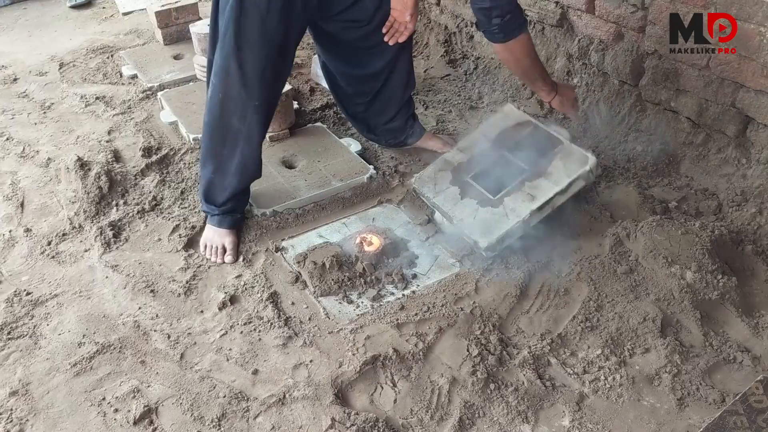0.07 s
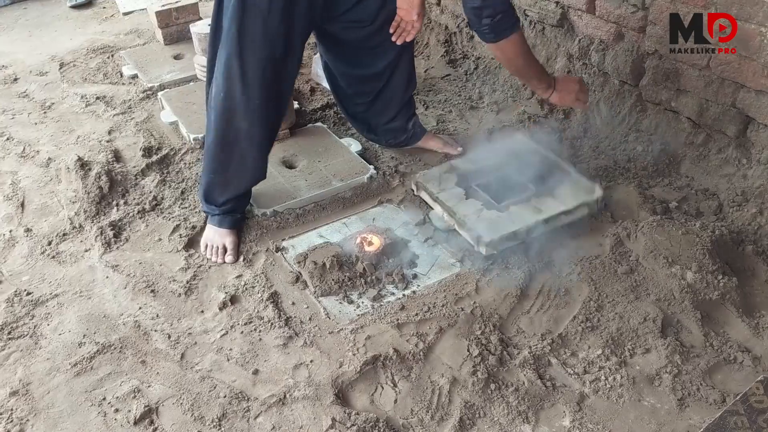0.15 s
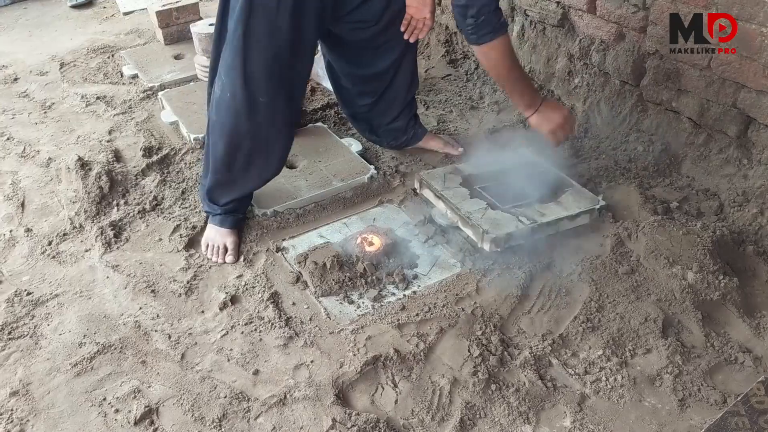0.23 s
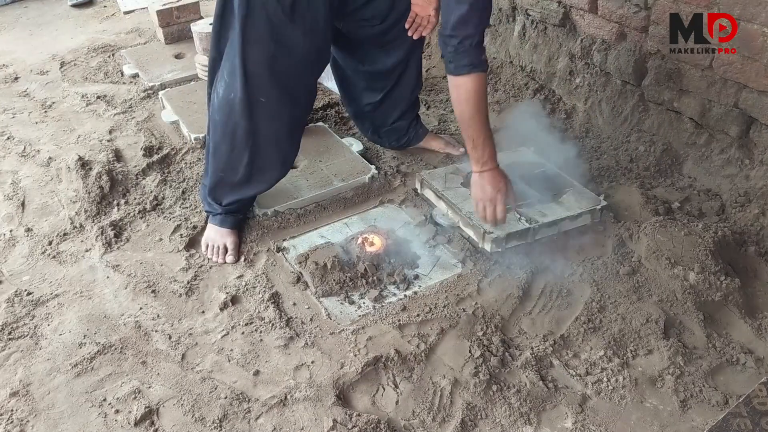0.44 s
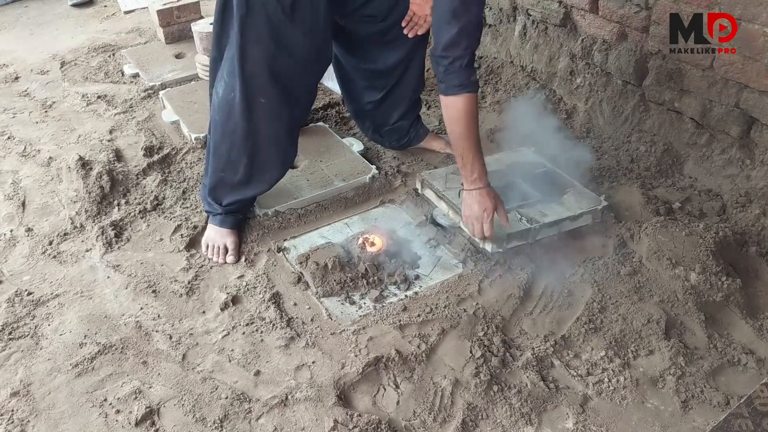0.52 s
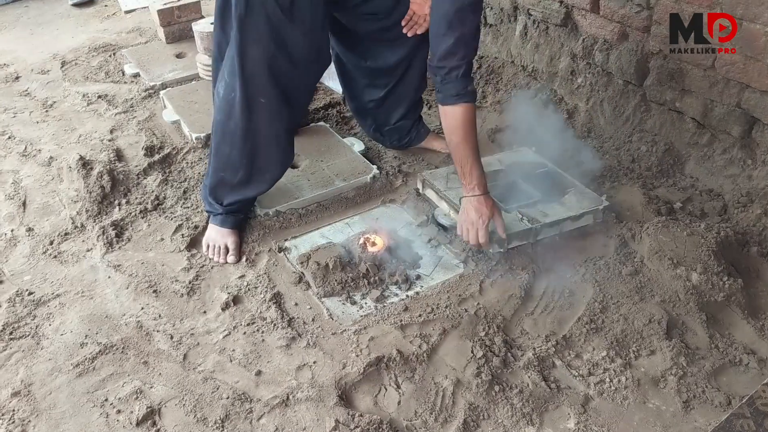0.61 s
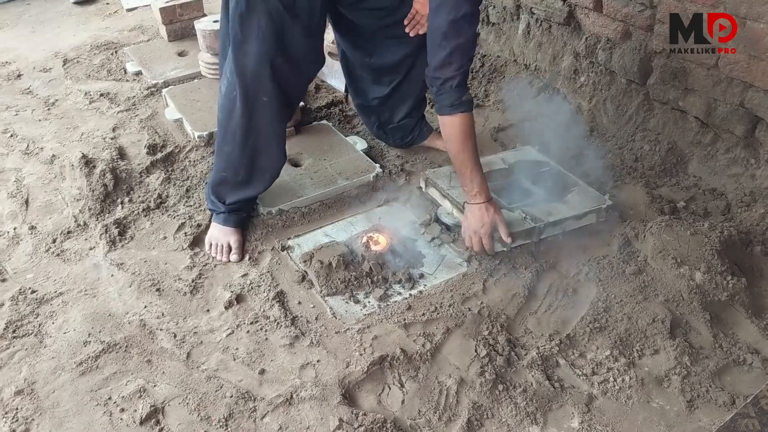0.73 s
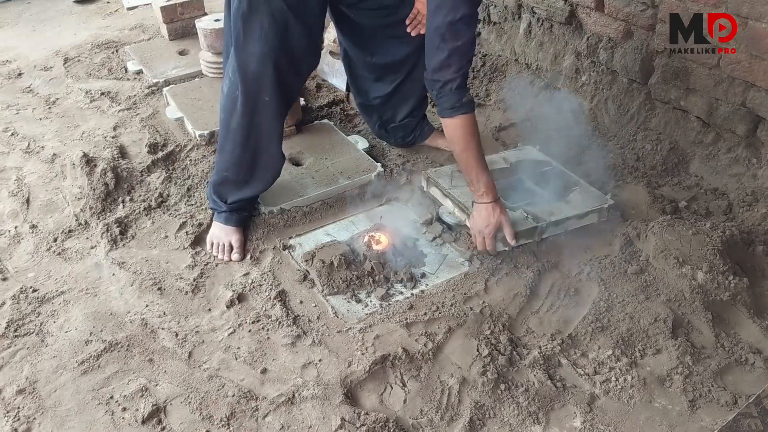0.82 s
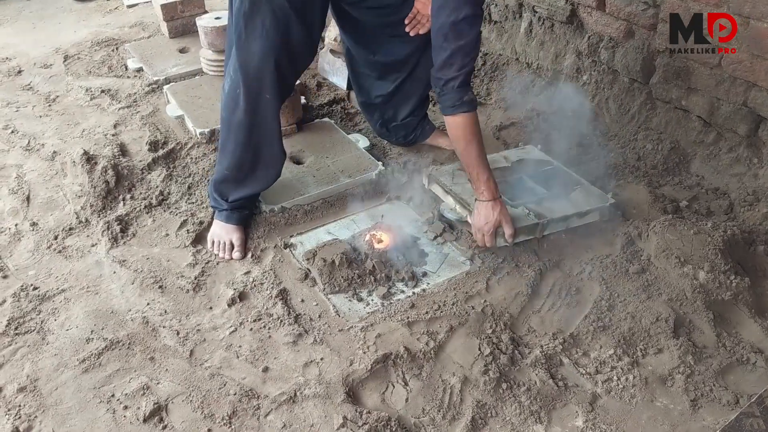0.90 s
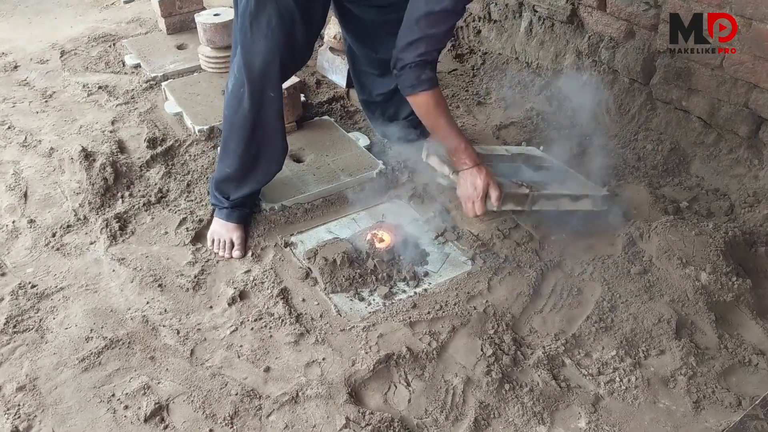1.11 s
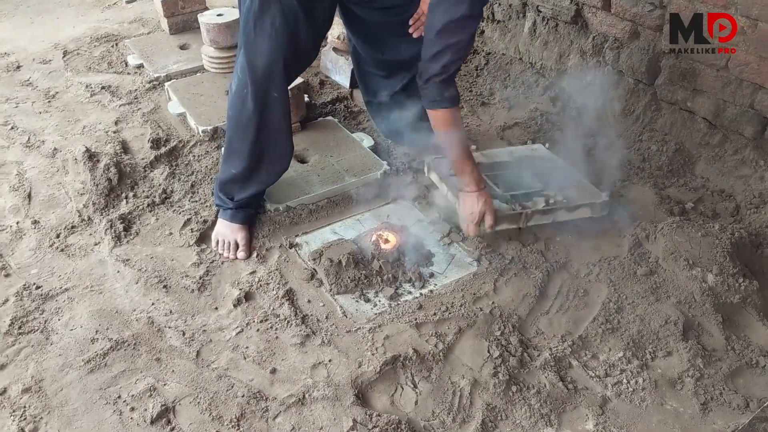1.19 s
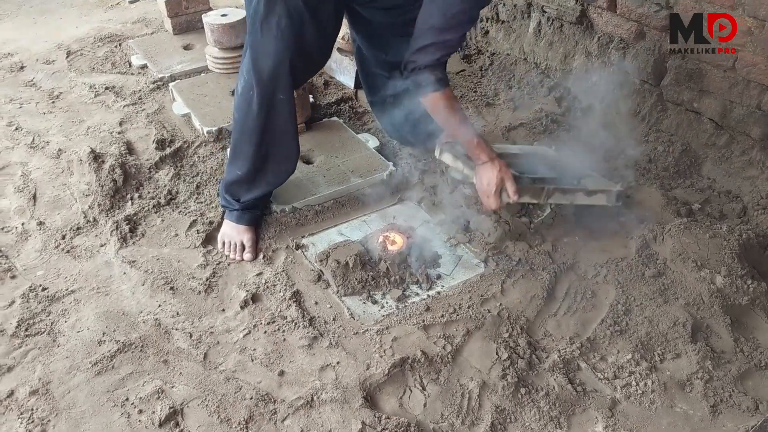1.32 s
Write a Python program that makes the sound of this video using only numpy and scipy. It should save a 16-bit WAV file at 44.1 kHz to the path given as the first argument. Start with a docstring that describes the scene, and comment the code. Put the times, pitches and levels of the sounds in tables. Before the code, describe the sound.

A heavy metal frame falls flat on sand with a sharp, briefly ringing clank and rocks to rest. It ticks faintly, then clanks twice more as it is shifted, over soft grating sand and distant workshop machinery.

```python
"""One microphone on a sandy foundry floor, machinery humming far off throughout.
A heavy metal moulding frame rings faintly, then falls flat with a thud at 0.23 s and rocks as it settles.
It ticks as a hand grips it, then clanks twice as it is shifted, at 0.88 and 1.25 s, sand grating below.
Each place of contact rings the same modes with other strengths, over a wash of dense weak modes
and the workshop's echo."""
import sys
import numpy as np
from scipy import signal
from scipy.fft import rfft, irfft, next_fast_len
from scipy.io import wavfile
from scipy.ndimage import map_coordinates

SR = 44100
rng = np.random.default_rng(int(sys.argv[2]) if len(sys.argv) > 2 else 0)


def unload_audio(sound):
    """Save the sound as a 16-bit wav file, at the path given as the first command line argument."""
    columns = np.transpose(np.atleast_2d(sound))
    # keep every value between -1 and 1, then stretch to whole-number steps
    steps = np.round(np.clip(columns, -1, 1) * 32767)
    wavfile.write(sys.argv[1], SR, steps.astype(np.int16))


N = 59535

# the frame's strong modes: f/Hz, t60/s, then relative level/dB when struck at each of the PLACES
FRAME_MODES = [(1200.0, 0.18, -21.0, -14.0, -11.0, -17.0, -14.0),
               (1600.0, 0.22, -22.0, -3.0, -15.0, -11.0, -16.0),
               (1739.0, 0.35, -4.0, -15.0, -25.0, -9.0, -7.0),
               (1775.0, 0.33, -7.0, -13.0, -24.0, -14.0, -13.0),
               (2300.0, 0.38, -13.0, -6.0, -17.0, -14.0, -12.0),
               (2406.0, 0.32, -8.0, -12.0, -11.0, -23.0, -15.0),
               (2830.0, 0.27, -11.0, -14.0, -17.0, -11.0, -5.0),
               (2975.0, 0.24, -3.0, -19.0, -20.0, -16.0, -15.0),
               (3060.0, 0.27, -10.0, -16.0, -25.0, -5.0, -9.0), (3316.0, 0.23, 0.0, -3.0, -12.0, 1.0, -7.0),
               (3451.0, 0.27, -21.0, -2.0, -21.0, -14.0, -15.0),
               (3750.0, 0.32, -2.0, -8.0, -26.0, -18.0, -2.0),
               (3887.0, 0.3, -6.0, -18.0, -14.0, -17.0, -4.0),
               (3930.0, 0.27, -10.0, -18.0, -14.0, -19.0, -2.0),
               (4010.0, 0.27, -5.0, -18.0, -18.0, -24.0, -15.0),
               (4124.0, 0.29, -1.0, -7.0, -16.0, -17.0, -13.0),
               (4465.0, 0.36, -10.0, -4.0, -8.0, -22.0, -19.0),
               (4530.0, 0.29, -15.0, -3.0, -4.0, -23.0, -19.0),
               (4670.0, 0.27, -16.0, -3.0, -15.0, -20.0, -11.0),
               (4764.0, 0.26, -5.0, -7.0, -14.0, -20.0, 0.0), (5245.0, 0.27, -1.0, -0.0, -2.0, -16.0, -8.0),
               (5290.0, 0.27, -3.0, -2.0, -0.0, -13.0, -7.0),
               (5421.0, 0.27, -8.0, -3.0, -4.0, -18.0, -18.0),
               (5650.0, 0.27, -11.0, -5.0, -8.0, -15.0, -18.0),
               (5905.0, 0.3, -15.0, -19.0, -11.0, -7.0, -13.0), (6605.0, 0.25, 0.0, 0.0, -9.0, -18.0, -2.0),
               (6740.0, 0.27, -24.0, -3.0, -22.0, -26.0, -19.0),
               (7191.0, 0.27, -5.0, -14.0, -9.0, -22.0, -13.0),
               (7375.0, 0.27, -10.0, -18.0, -10.0, -29.0, -23.0),
               (7750.0, 0.33, -5.0, -20.0, -18.0, -18.0, -8.0),
               (8193.0, 0.23, -4.0, -13.0, 0.0, -15.0, -12.0),
               (8441.0, 0.27, -13.0, -6.0, -6.0, -24.0, -17.0),
               (9132.0, 0.22, -2.0, -18.0, -7.0, -25.0, -14.0),
               (9250.0, 0.22, -8.0, -13.0, -13.0, -24.0, -13.0),
               (9530.0, 0.22, -23.0, -1.0, -21.0, -24.0, -18.0),
               (9851.0, 0.22, -4.0, -24.0, -15.0, -25.0, -14.0),
               (10330.0, 0.27, -12.0, -24.0, -8.0, -19.0, -8.0),
               (11550.0, 0.22, -16.0, -35.0, -32.0, -29.0, -19.0),
               (12460.0, 0.22, -16.0, -26.0, -24.0, -33.0, -23.0)]
# places of contact on the frame: face, edge, corner, rim, lug
PLACES = ["face", "edge", "corner", "rim", "lug"]


def amp(db):
    """Decibels to gain."""
    return 10 ** (np.asarray(db) / 20)


def unit(x):
    """Scale to rms 1."""
    return x / np.sqrt(np.mean(x ** 2) + 1e-20)


def along(points, hz):
    """Read (f/Hz, value) points on a log frequency axis."""
    freqs, values = np.transpose(points)
    return np.interp(np.log(hz + 1), np.log(freqs + 1), values)


def wobble(per_s, t):
    """A smooth random curve at times t, with per_s knots a second."""
    return map_coordinates(rng.standard_normal(2048), [t * per_s], mode="wrap")


def filtered(x, response):
    """Shape x by a gain that depends on frequency."""
    size = next_fast_len(N + SR // 4)
    return irfft(rfft(x, size) * response(np.fft.rfftfreq(size, 1 / SR)), size)[:N]


def noise(response):
    """Coloured noise of rms 1."""
    return unit(filtered(rng.standard_normal(N), response))


def wavering_tone(hz, t, depth, per_s):
    """A tone of rms 1 whose strength and phase drift."""
    drift = 1 + depth * (wobble(per_s, t) + 1j * wobble(per_s, t))
    return unit(np.real(drift * np.exp(2j * np.pi * (hz * t + rng.random()))))


def add(out, x, start_s):
    """Mix x into out from start_s on; whatever falls before time zero is cut."""
    start = round(start_s * SR)
    x, start = x[max(-start, 0):], max(start, 0)
    out[start:start + len(x)] += x[:N - start]


def far_machinery(t):
    """Machines far across the workshop reach the microphone as rumble, hiss and a wavering hum."""
    # tones of the hum: f/Hz, level/dB
    hum_tones = [(64.6, -70), (107.7, -64.5), (176, -72), (355.3, -66.5)]
    # spectrum of the rumble: f/Hz, relative level/dB
    rumble_spectrum = [(15, -59), (25, -33), (35, -3), (49, 1), (113, -6.5), (135, -2), (172, -2),
                       (234, -9), (328, -12), (356, 0), (386, -16), (738, -18), (1200, -28), (1560, -55),
                       (2640, -120)]
    # spectrum of the hiss: f/Hz, relative level/dB
    hiss_spectrum = [(590, -12.5), (1000, -5.5), (1100, -8), (2010, -9), (2470, -15.5), (2650, -11.5),
                     (3420, -13), (5070, -16.5), (5570, -17), (9380, -18.5), (16000, -35.5)]
    hum = sum(amp(db) * wavering_tone(hz, t, depth=0.28, per_s=8) for hz, db in hum_tones)
    rumble = noise(lambda hz: amp(along(rumble_spectrum, hz)))
    hiss = noise(lambda hz: amp(along(hiss_spectrum, hz)))
    return amp(-54.5) * rumble + amp(-66) * hiss + hum


def crack(colour, t, hold_s=0.0024, t60_s=0.015):
    """The contact itself: a burst of noise that holds for an instant and dies fast."""
    return noise(colour)[:len(t)] * amp(-60 * np.maximum(t - hold_s, 0) / t60_s)


def ring(place, contact, t, scatter_db=2):
    """The strong modes, weighted by the place and the hardness of the contact."""
    freqs, t60s, *levels = np.transpose(FRAME_MODES)
    gains = amp(levels[PLACES.index(place)] + scatter_db * rng.standard_normal(len(freqs)))
    gains = gains * contact(freqs)
    gains = gains / np.linalg.norm(gains)
    # close pairs and echoes make each mode waver
    return sum(gain * amp(-60 * t / t60) * wavering_tone(hz, t, depth=0.25, per_s=50)
               for hz, t60, gain in zip(freqs, t60s, gains))


def clusters(place, hz, width_hz=70):
    """Gain that crowds the weak modes around the strong ones which this place excites."""
    centres, _, *levels = np.transpose(FRAME_MODES)
    grid = np.linspace(0, SR / 2, 2048)
    resonances = 1 / (1 + (2 * (grid[:, None] - centres) / width_hz) ** 2)
    peaks = resonances @ amp(levels[PLACES.index(place)])
    return 1 + amp(3) * np.interp(hz, grid, peaks)


def combed(colour, spacing_hz=60, depth_db=7):
    """Break a smooth colour into many narrow, irregular resonances."""
    knots = rng.standard_normal(1024)
    ripple = lambda hz: np.interp(hz / spacing_hz, np.arange(len(knots)), knots)
    return lambda hz: colour(hz) * amp(depth_db * np.clip(ripple(hz), -2, 1))


def wash(colour, t, build_s=0.0014):
    """Dense weak modes and the workshop's echo: each frequency dies at its own speed."""
    # decay of the wash: f/Hz, t60/s
    decay_times = [(400, 0.13), (1500, 0.36), (4000, .32), (8000, 0.31), (14000, 0.2)]
    hz, slice_s, spectra = signal.stft(noise(colour), SR, nperseg=256)
    decay = amp(-60 * slice_s / along(decay_times, hz)[:, None])
    _, tail = signal.istft(spectra * decay, SR, nperseg=256)
    return tail[:len(t)] * (1 - np.exp(-t / build_s))


def frame_blows():
    """Every blow on the frame is a brief crack of contact, then ring and wash that the sand chokes."""
    # spectrum of the dense weak modes, by place of contact: f/Hz, relative level/dB
    weak_spectra = {"face": [(180, -92), (300, -19.5), (756, -9.5), (1050, -23.5), (1220, -7), (1420, -39),
                    (1730, 1.5), (1940, -33), (2360, -5), (2690, -10), (3340, -7), (3510, -12),
                    (4000, -2.5), (4350, -15.5), (5390, -4), (6250, -20.5), (6570, -6.5), (10100, -2),
                    (11000, -13), (12700, -4.5), (15500, -28.5)], "edge": [(410, -70.5), (700, -26),
                    (776, -15), (1560, -3), (2080, -17), (2430, -4.5), (3030, -20.5), (3360, -2.5),
                    (3970, -17), (4520, -7), (5360, -8.5), (6020, -10), (6680, -6.5), (8990, -8.5),
                    (9850, -8), (12000, -24.5), (15500, -10.5)], "corner": [(410, -40), (700, -70),
                    (1070, -20), (1220, -13), (2050, -16), (2370, -7.5), (2590, -12.5), (3320, -10),
                    (3680, -27), (4410, -4.5), (4890, -21), (5430, -3.5), (6180, -9.5), (8320, -3),
                    (10600, -13), (11200, -28), (15500, -18.5)], "rim": [(800, -25), (2400, -12),
                    (3200, 3.5), (4300, -12), (5800, 5.5), (7000, -10), (12000, -12), (15000, -20)],
                    "lug": [(800, -19), (2500, 7.5), (3900, -4), (7500, -16), (10300, -12), (15000, -40)]}
    # blows: t/s, place, ring/dB, wash/dB, crack/dB, contact centre/Hz, half-width/octaves,
    # attack/s, choked after/s
    blows = [(-.02, "face", -49, -38.5, -38, 3240, 0.62, 0.0009, .13),
             (-.008, "rim", -43.5, -45, -60, 4880, 0.23, .0003, .13),
             (0.2258, "face", -19, -18, -13, 6160, 3, 0.000067, .22),
             (.268, "face", -28.5, -53, -57, 2900, .04, .005, .035),
             (0.296, "face", -37, -49, -60, 1727, 0.084, 0.0017, .06),
             (0.296, "face", -38.5, -38.5, -60, 4150, 0.069, 0.0024, .09),
             (0.314, "face", -35.5, -38, -62, 4460, 0.07, 0.0036, 0.15),
             (0.5281, "rim", -56, -60, -48.5, 7020, 2.05, 0.00036, .1),
             (0.63, "rim", -57.5, -56.5, -46, 2640, 0.56, 0.0028, .15),
             (.664, "lug", -78, -71.5, -55, 8250, 1.2, 0.00059, .2),
             (.678, "lug", -67, -62.5, -71, 9300, 0.97, 0.00079, .2),
             (0.692, "lug", -61.5, -86, -55, 10500, 0.48, 0.00035, .2),
             (.8732, "edge", -44.5, -39.5, -29, 2600, 0.62, 0.00045, .15),
             (0.8789, "edge", -38, -36, -31, 6500, 1.1, 0.00043, .15),
             (1.113, "lug", -51.5, -62, -62, 4030, 0.082, .003, 0.054),
             (1.121, "lug", -49, -60, -66.5, 6740, 2, 0.0027, .2),
             (1.2511, "corner", -36.5, -34.5, -27.5, 6370, 7.5, .0005, .2)]
    out, t = np.zeros(N), np.arange(SR // 2) / SR
    for start_s, place, ring_db, wash_db, crack_db, centre_hz, octaves, attack_s, choke_s in blows:
        contact = lambda hz: 1 / (1 + (np.log2((hz + 1) / centre_hz) / octaves) ** 2)
        colour = lambda hz: amp(along(weak_spectra[place], hz)) * clusters(place, hz) * contact(hz)
        blow = amp(crack_db) * crack(colour, t)
        blow += amp(ring_db) * ring(place, contact, t)
        blow += amp(wash_db) * wash(combed(colour), t)
        envelope = (1 - np.exp(-t / attack_s)) * np.exp(-(t / choke_s) ** 4)
        add(out, blow * envelope, start_s)
    return out


def grating_sand(t, grains_per_s=170):
    """Grains on the floor grate softly while the frame slides."""
    # scrapes under the frame: t/s, length/s, level/dB
    scrapes = [(0.181, 0.12, -59), (0.662, 0.099, -67.5), (1.104, 0.37, -60.5)]
    # spectrum of the grating: f/Hz, relative level/dB
    sand_spectrum = [(1000, -1), (3000, 2), (9000, -1.5), (15000, -12)]
    out = np.zeros(N)
    for start_s, length_s, db in scrapes:
        grit = noise(lambda hz: amp(along(sand_spectrum, hz)))
        roughness = amp(-0.5 * wobble(grains_per_s, t))
        progress = np.clip((t - start_s) / length_s, 0, 1)
        swell = np.sqrt(np.abs(np.sin(np.pi * progress)))
        out += amp(db) * unit(grit * roughness) * swell
    return out


def thuds(t, centre_hz=280, octaves=0.88, rise_s=0.004, t60_s=0.4):
    """A soft, dull push where the frame's weight comes down on the sand."""
    # landings: t/s, level/dB
    landings = [(.227, -57.5), (1.253, -51)]
    out = np.zeros(N)
    for start_s, db in landings:
        body = noise(lambda hz: np.exp(-(np.log2((hz + 1) / centre_hz) / octaves) ** 2))
        envelope = amp(db - 60 * t / t60_s) * (1 - np.exp(-t / rise_s))
        add(out, envelope * body, start_s)
    return out


def scene():
    """Frame, sandy floor and far machinery, heard from one spot in the foundry."""
    t = np.arange(N) / SR
    return (frame_blows() + grating_sand(t) + far_machinery(t) + thuds(t))[None]


def record(dry):
    """The microphone drops the deep bass and has a narrow treble peak just below its band limit."""
    low_cut_hz, top_hz = 54, 15900
    peak_hz, peak_width_hz, peak_db = 15550, 350, 8
    low_cut = lambda hz: 1 / np.sqrt(1 + (low_cut_hz / (hz + 1)) ** 8)
    peak = lambda hz: amp(peak_db * np.exp(-((hz - peak_hz) / peak_width_hz) ** 2))
    top_cut = lambda hz: 1 / (1 + (hz / top_hz) ** 150)
    return np.array([filtered(x, lambda hz: low_cut(hz) * peak(hz) * top_cut(hz)) for x in dry])


dry = scene()
out = record(dry)
unload_audio(out)
```